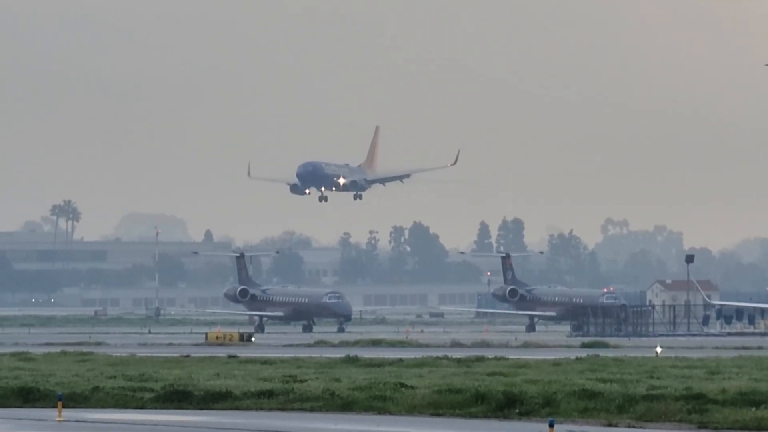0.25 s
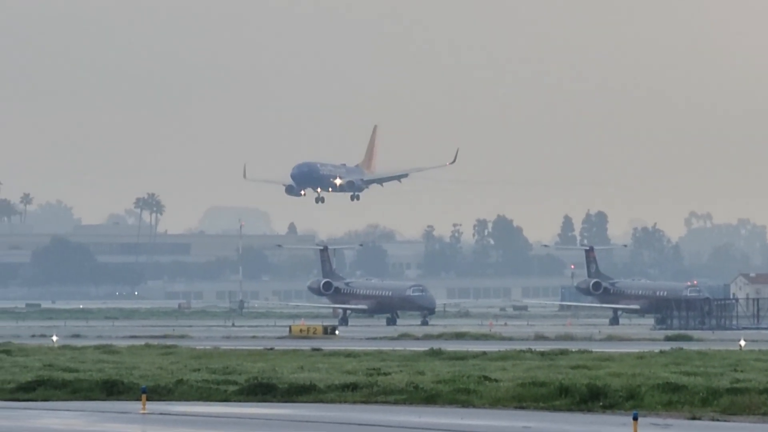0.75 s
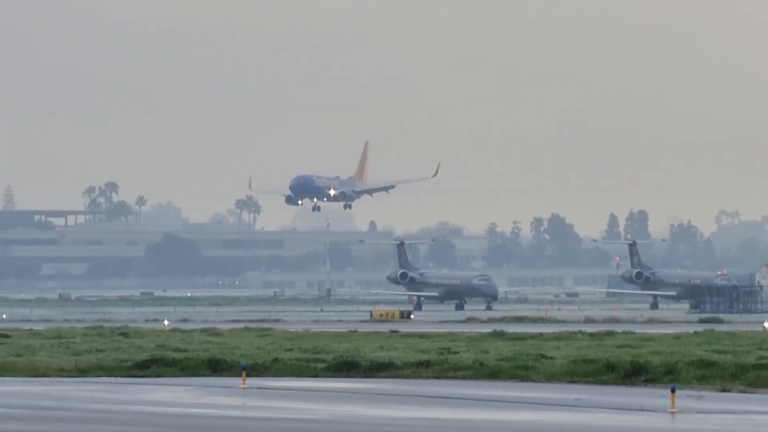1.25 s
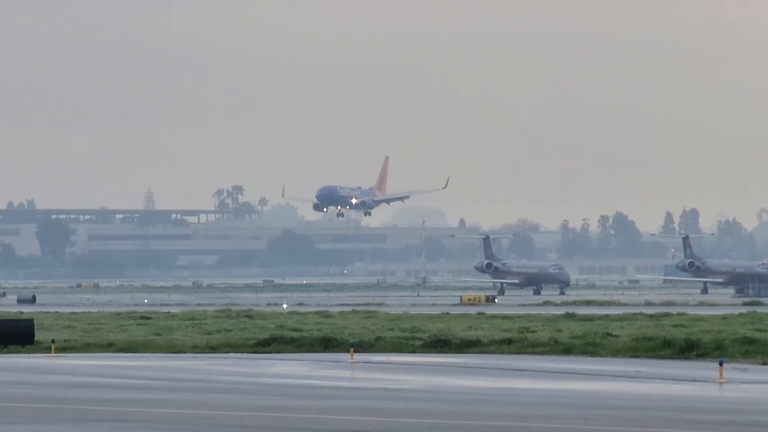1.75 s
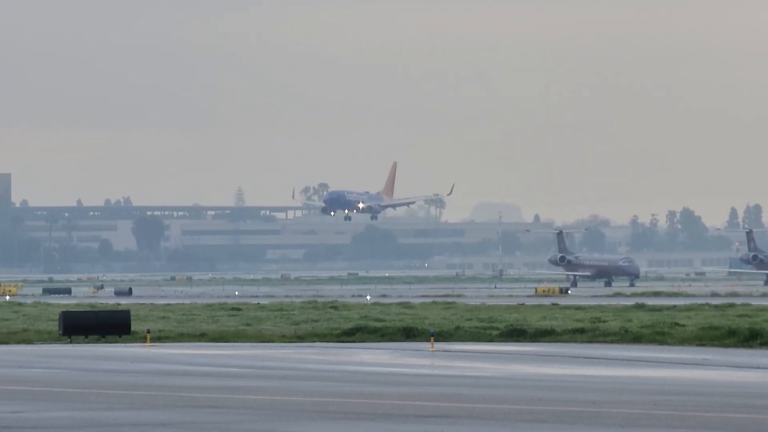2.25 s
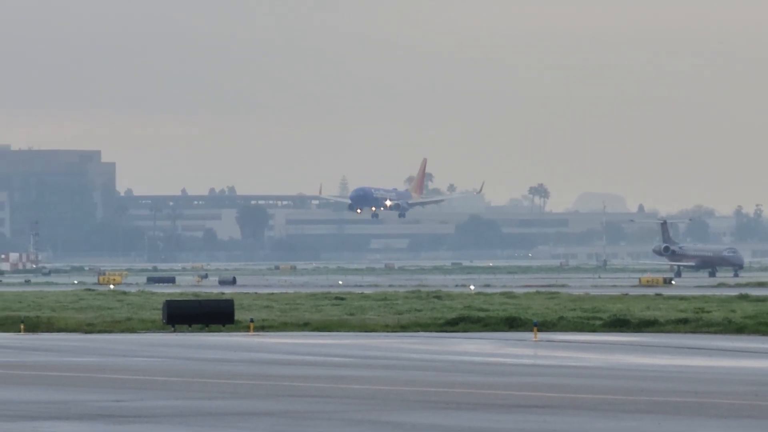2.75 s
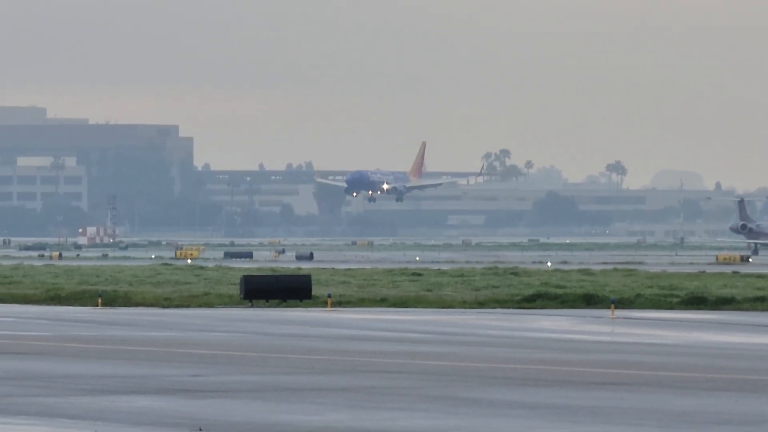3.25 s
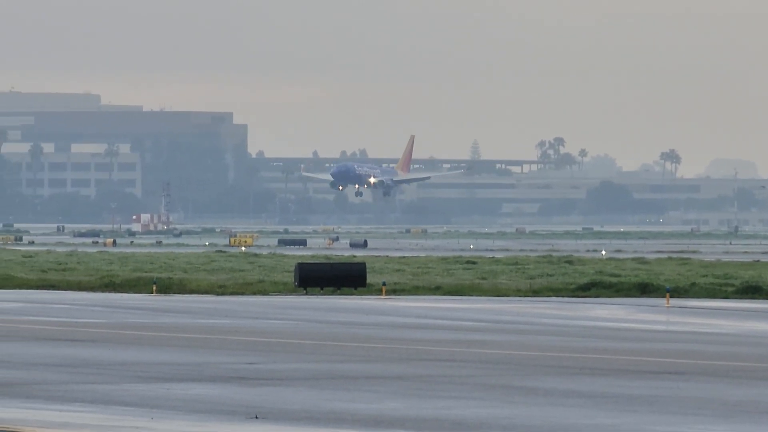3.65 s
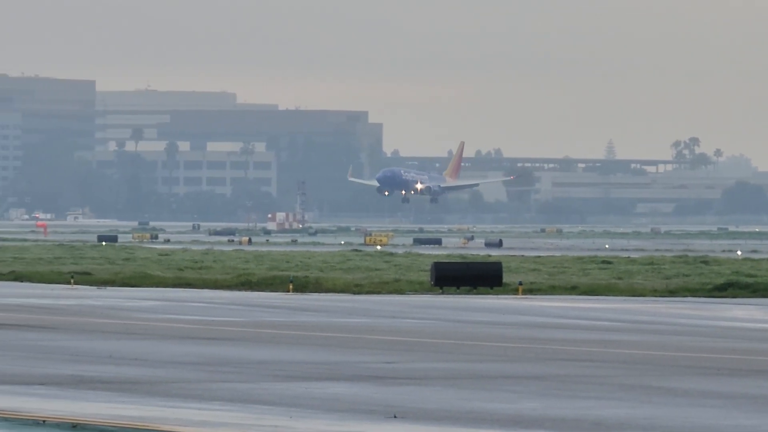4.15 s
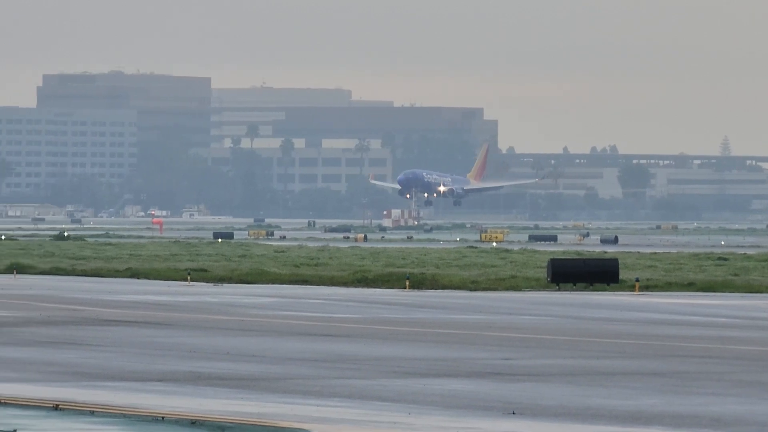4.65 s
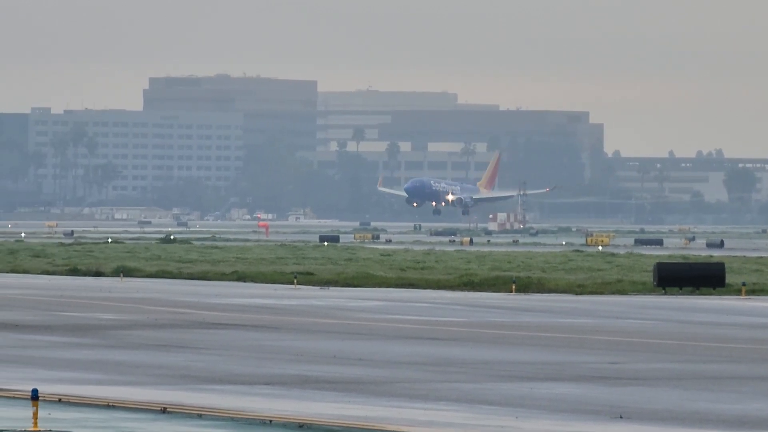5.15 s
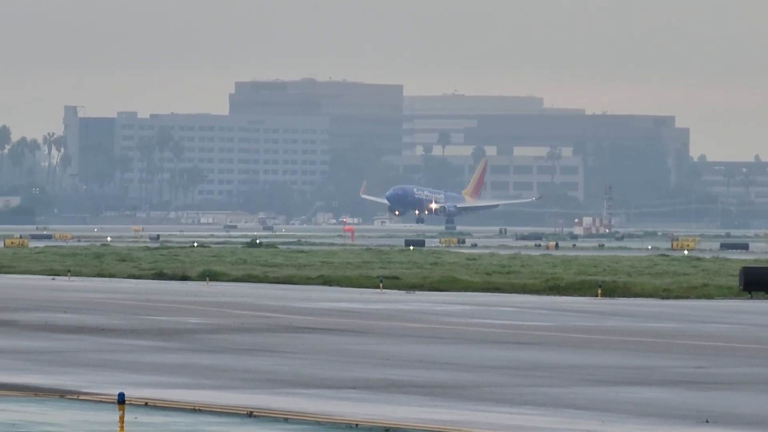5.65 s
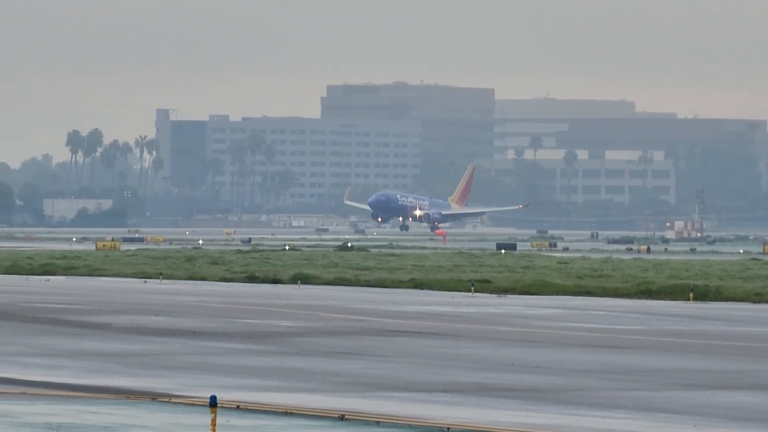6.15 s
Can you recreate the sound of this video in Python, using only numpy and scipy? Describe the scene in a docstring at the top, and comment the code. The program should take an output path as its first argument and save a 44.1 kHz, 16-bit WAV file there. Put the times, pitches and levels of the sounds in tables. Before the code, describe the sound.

A jet airliner lands far across an open airfield. Its deep, churning exhaust rumble is the main sound, running for about six and a half seconds with gentle swells, over a steady wash of other distant engines. An airy fan howl is strongest in the first second, with two short downward swishes. It swells again between 2 and 2.7 seconds, returns more weakly from about 4.3 to 5.5, then fades. Thin, wavering fan tones come and go, clearest around half a second and again near 3 seconds. Close to the microphone, a plastic camera body gives a quick cluster of ticks at about 2.9 seconds, the first one sharpest. A jacket rustles faintly with tiny snaps here and there, mostly between 2.5 and 4.3 seconds. A very faint microphone hiss lies underneath, and the rumble continues to the end.

```python
"""A jet airliner lands far across an airfield. Its churning exhaust rumbles, and its engine fans make
a howl, which the moving air carries over in swells, and a few thin tones. Other far engines blend
into a steady wash. Close by, a jacket rustles and snaps as its fibres slip, and a plastic camera body
ticks under the hand. A faint microphone hiss lies beneath it all."""
import sys
import numpy as np
from scipy import signal
from scipy.fft import rfft, irfft
from scipy.io import wavfile
from scipy.ndimage import uniform_filter1d

SR = 44100
rng = np.random.default_rng(int(sys.argv[2]) if len(sys.argv) > 2 else 0)


def transcribe(signal):
    """Save signal, clipped to [-1, 1], as a 16-bit WAV file at the path in sys.argv[1]."""
    frames = np.atleast_2d(signal).T
    limited = np.clip(frames, -1, 1)
    pcm = np.round(limited * 32767).astype(np.int16)
    wavfile.write(sys.argv[1], SR, pcm)


N = 282681

# how the rumble swells: (time [s], deep part [dB], upper part [dB], hoarse part [dB])
RUMBLE_SWELLS = [(0.0, -24, -25.5, -24.5), (0.27, -28.5, -18.5, -25), (0.55, -29.5, -27, -25),
                 (.85, -26.5, -23, -25.5), (1.15, -28, -22.5, -27.5), (1.58, -23.5, -28, -28.5),
                 (1.85, -27, -20.5, -28.5), (2.3, -21, -25, -27.5), (2.75, -25, -27.5, -27.5),
                 (3.1, -29, -25.5, -27), (3.5, -28, -26, -29), (4.2, -26.5, -27.5, -27),
                 (4.85, -24.5, -24, -29), (5.3, -26, -23.5, -28), (5.8, -27.5, -21.5, -28.5),
                 (6.41, -28.5, -21.5, -28)]
# how strong its low and high sounds are: (frequency [Hz], level [dB])
RUMBLE_COLOUR = [(12, -41), (25, -27), (35, -9), (50, 3.5), (85, 1), (110, 0), (140, -3.5), (180, -10),
                 (250, -17), (350, -21.5), (500, -30.5), (700, -75), (1500, -120)]
# how its two sides compare: (frequency [Hz], likeness [0-1], left lead [rad], left minus right [dB])
RUMBLE_STEREO = [(20, 0.93, 0, 2.5), (60, 0.99, -.05, 0), (131, .98, -.1, -0.1), (213, 0.99, -0.067, 0),
                 (430, 0.7, 0.012, 0.5)]


def exhaust_rumble():
    """Churning exhaust makes a low noise whose deep, upper and hoarse parts each swell on their own."""
    def swell_db(hz, t):
        deep_db, upper_db, hoarse_db = follow(RUMBLE_SWELLS, t)
        upper, hoarse = above(hz, 100, steepness=3.7), above(hz, 171.7, steepness=7.6)
        return (1 - upper) * deep_db + (upper - hoarse) * upper_db + hoarse * hoarse_db
    return noise(RUMBLE_COLOUR, RUMBLE_STEREO, 4096, swell_db, patch_db=1, patch_hz=25, patch_s=.21)


# how the howl swells: (time [s], level [dB], extra level above about 1900 Hz [dB])
HOWL_SWELLS = [(0.0, -38, -10), (0.07, -37, -5.5), (0.2, -34, -2.5), (0.36, -35.5, -5), (0.55, -38, 0),
               (0.68, -39, -2.5), (0.95, -44, -4), (1.08, -39.5, -8), (1.14, -46.5, -2.5), (1.6, -47, -7.5),
               (1.8, -44, -1), (1.93, -47, -4.5), (2.15, -41, -5), (2.27, -39.5, -1.5), (2.4, -44, -2),
               (2.56, -39.5, -4), (2.65, -45, -0.5), (3.1, -51.5, 0), (3.6, -56, 3.5), (4.3, -49.5, 0),
               (4.95, -49, -0.5), (5.06, -46, 6), (5.16, -54, 6), (5.32, -49, 4), (5.5, -51, 2),
               (6.41, -62, 8)]
# how strong its low and high sounds are: (frequency [Hz], level [dB])
HOWL_COLOUR = [(530, -42), (900, -13), (1130, -12), (1310, -5), (1530, -4.5), (2010, -0.5), (2190, -2),
               (2450, -10.5), (2920, -11.5), (3390, -21), (3850, -34.5), (4500, -56.5), (5850, -85),
               (9900, -120)]
# how its two sides compare: (frequency [Hz], likeness [0-1], left lead [rad], left minus right [dB])
HOWL_STEREO = [(1010, 0.81, -0.47, -3), (1300, .92, 0.97, 3), (1720, 0.85, -1.4, -0.5), (2200, 1, -0.65, 0),
               (2400, 0.94, -.7, 3.5), (3000, 0.095, -0.4, -0.5), (3400, 1, 0.58, -6),
               (4170, 0.18, -0.96, 7)]
# a louder band slides down through it: (start [s], length [s], from [Hz], to [Hz], boost [dB])
SWISHES = [(0.059, 0.43, 2380, 1236, 4.5), (0.42, 0.21, 2080, 1192, 7)]


def fan_howl(flutter_db=1.5, swish_width_hz=170):
    """Fan blades make a streaky noise; moving air swells it and changes how bright it is."""
    def swell_db(hz, t):
        level_db, treble_db = follow(HOWL_SWELLS, t)
        total_db = level_db + flutter_db * wander(t, .03) + above(hz, 1900, steepness=16) * treble_db
        for start, length, from_hz, to_hz, boost_db in SWISHES:
            progress = np.clip((t - start) / length, 0, 1)
            centre_hz = from_hz * (to_hz / from_hz) ** progress
            band = np.exp(-((hz - centre_hz) / swish_width_hz) ** 2)
            total_db = total_db + boost_db * np.sqrt(np.sin(np.pi * progress) + 1e-9) * band
        return total_db
    return noise(HOWL_COLOUR, HOWL_STEREO, 1024, swell_db, patch_db=3, patch_hz=45, patch_s=.053)


# thin tones of the fans: (pitch [Hz], waver [Hz], left lead [rad], list of (time [s], level [dB]))
FAN_TONES = [(685.3, 1.3, .2, [(0, -63), (.85, -59), (1.4, -59), (2.35, -60), (4.0, -57.5), (4.7, -59.5),
             (5.4, -68), (6.41, -68)]), (1386, 4., 1.0, [(1.9, -70), (2.25, -51), (2.55, -52), (2.9, -46),
             (3.05, -58), (3.5, -74), (3.9, -57), (4.2, -54), (4.55, -54), (4.9, -55), (5.1, -65),
             (5.35, -52), (5.6, -64), (5.78, -51), (5.98, -68), (6.2, -51), (6.41, -60)]),
             (1350, 4., .4, [(0, -62), (.25, -62), (.41, -48), (.46, -52), (.53, -39), (.68, -64),
             (1.25, -63), (1.37, -54), (1.6, -72), (2.1, -58)]), (1450, 4., .4, [(0, -53), (.07, -45),
             (.14, -57), (.24, -41), (.45, -59), (.55, -48), (.7, -63), (.95, -54), (1.17, -72),
             (1.43, -48), (1.55, -60), (2.13, -54), (2.5, -59), (3.0, -67), (4.8, -65), (5.01, -52),
             (5.2, -75)]), (2538, 7., .8, [(3, -71), (5, -69), (6.41, -71)]), (5308, 12., 2.1, [(4.2, -93),
             (5.2, -88), (6.41, -88)])]


def fan_tone(hz, waver_hz, lead, levels, flicker_db=3.5):
    """Spinning blades make a slightly wavering tone that comes and goes on its long way through the air."""
    t = np.arange(N) / SR
    flicker = unit_level(gain_of(flicker_db * wander(t, .035)))
    level = gain_of(follow(levels, t)[0]) * flicker
    phase = 2 * np.pi * np.cumsum(hz + waver_hz * wander(t, .0678)) / SR
    start, end = levels[0][0], levels[-1][0]
    already_on = (start == 0) * (t < .1)  # no fade-in for a tone that is there from the start
    fade = np.clip(np.minimum(t - start, end - t) / .1 + already_on, 0, 1)
    return np.sqrt(2) * level * fade * np.sin([phase + lead, phase])


# how strong the wash's low and high sounds are: (frequency [Hz], level [dB])
WASH_COLOUR = [(260, -9.5), (500, -7), (800, -8), (1200, -10.5), (1400, -2.5), (1620, -12), (2050, -11.5),
               (2950, -17), (3300, -26), (3900, -30.5), (4250, -39), (4700, -39.5), (5300, -40.5),
               (6000, -52.5), (9000, -90.5)]
# how its two sides compare: (frequency [Hz], likeness [0-1], left lead [rad], left minus right [dB])
WASH_STEREO = [(313, 1, 0.5, -1), (504, 0.76, -0.5, 0.5), (750, 0.9, 1.17, -0.5), (1274, 0.16, -2, -0.5),
               (1400, 1, -4.5, -2), (1750, 0.085, -2, -1), (1960, 1, 0.5, 1), (2540, 0.62, -1.36, 0),
               (3350, 0.83, 3.5, 2), (3460, 0.17, 3, 7.5), (4080, 0.8, -7.5, -3.5), (4540, 0.63, -8, -6),
               (5970, 0.02, 2.5, -3)]


def engine_wash():
    """Many far engines blend into a steady rush that drifts in patches."""
    return gain_of(-44) * noise(WASH_COLOUR, WASH_STEREO, 1024, patch_db=1.2, patch_hz=250, patch_s=.07)


# ticks of the camera body: (time [s], peak [dB], left minus right [dB])
TICKS = [(2.8677, -20, 4.5), (2.883, -32, -0.5), (2.8904, -39, 0.5), (2.8976, -35, -2), (2.913, -28, -1),
         (2.9236, -31, 5), (2.9314, -36, 5)]
# notes its shell rings at: (pitch [Hz], level [dB], time to fade by 60 dB [s])
SHELL_NOTES = [(2080, 4, 0.01), (2690, 5.5, 0.0082), (3340, -2, 0.0065), (4260, -15, 0.0086),
               (5530, -20, 0.015), (6400, -24, 0.013), (7400, -30, 0.007)]


def camera_ticks(rise_s=.00033):
    """The plastic shell rings briefly under the hand, a little differently each time and on each side."""
    out, t = np.zeros((2, N)), np.arange(1500) / SR
    hz, note_db, ring_s = np.transpose(SHELL_NOTES)[:, :, None]
    for time, peak_db, pan_db in TICKS:
        phase, uneven = rng.random((2, 2, len(SHELL_NOTES), 1))
        levels = gain_of(note_db + 4 * (uneven - .5) - 60 * t / ring_s)
        notes = levels * np.sin(2 * np.pi * (hz * t + .4 * phase[0] + .1 * phase))
        tick = notes.sum(1) * (1 - np.exp(-t / rise_s))
        tick /= abs(tick).max(1, keepdims=True)
        add(out, time, gain_of(peak_db) * sides(pan_db)[:, None] * tick)
    return out


# rubs of cloth: (middle [s], length [s], level [dB], dull minus bright [dB], left minus right [dB])
STROKES = [(0.184, .08, -76.5, -11, -5), (0.268, .08, -74.5, -11, 0), (1.136, 0.057, -85, -14, -8.5),
           (1.74, 0.066, -76.5, 6, -1.5), (1.81, .04, -79.5, 5, 1), (1.97, 0.042, -78.5, -13.5, -11),
           (2.056, 0.092, -76.5, -10.5, -9), (2.19, 0.032, -77, -3.5, -8), (2.396, .04, -80, -10, -3),
           (2.492, .08, -74, -5, -7), (2.59, 0.11, -71, -4, 3), (2.764, 0.087, -63.5, -5, -7),
           (2.837, 0.021, -62, -6, -2), (2.89, .05, -66.5, 17, 1), (2.94, .07, -60, 0, 0),
           (3.02, 0.06, -70, 12, 0), (3.065, 0.11, -55, -10, -4), (3.193, 0.12, -71, -10, 1),
           (3.31, 0.067, -66, -0.5, 0), (3.42, 0.13, -72.5, -4, -4), (3.612, 0.1, -72, -1, -1),
           (3.927, 0.12, -67.5, -5, 1), (4.024, .05, -83, -10, 2), (4.214, 0.078, -73.5, -5.5, 1),
           (4.316, 0.098, -72, -5, -1), (4.86, 0.066, -76.5, -5, -3), (4.93, .06, -71.5, -5, 0),
           (5.229, .07, -81, 2, 4), (5.397, .04, -74.5, -4, 0), (5.636, .06, -78, -9.5, 5),
           (6.254, 0.041, -86, -9, 3)]


def jacket_rustle(slips_per_s=1100, spread_db=2, slip_s=.0006, resting_db=-88.5, clump_db=1.5):
    """Fibres slip in tiny, uneven bursts over a soft rub, louder with each stroke of the cloth."""
    block = 64  # samples that share one level
    t = np.arange(0, N, block) / SR
    bright_gain = np.full((2, len(t)), gain_of(resting_db))
    dull_gain = bright_gain * gain_of(4)
    for middle, length, level_db, dull_db, pan_db in STROKES:
        fall_db = 7.5 * abs(2 * (t - middle) / length) ** 1.4
        stroke = gain_of(level_db - fall_db) * sides(pan_db)[:, None]
        bright_gain += stroke
        dull_gain += gain_of(dull_db) * stroke
    slip_sizes = gain_of(spread_db * np.minimum(rng.exponential(1, N), 4))
    slips = slip_sizes * (rng.random(N) < slips_per_s / SR)
    bursts = unit_level(signal.lfilter([1], [1, -np.exp(-1 / (SR * slip_s))], slips))
    rubbing = unit_level((1 + bursts) * rng.standard_normal((2, N)))
    bright, dull = cloth_voices(rubbing)
    clumps = gain_of(clump_db * wander(t, .0075))
    bright_gain, dull_gain = np.repeat(clumps * [bright_gain, dull_gain], block, axis=2)[..., :N]
    return bright_gain * bright + dull_gain * dull


# snaps of cloth: (time [s], level [dB], left minus right [dB], dull minus bright [dB])
SNAPS = [(0.1266, -58, 6, -4), (0.1555, -56, -6.5, -16), (0.2119, -55, -4, -18), (1.1243, -63.5, 1, -10),
         (1.7402, -62, -3, 6), (1.9644, -61, -9, -20), (2.0283, -60, -13, -14), (2.0747, -59, -9, -18),
         (2.1869, -62.5, -8, -8), (2.4956, -55, -5, -2), (2.7541, -55, -15, -18), (2.829, -48, 3, -9),
         (2.8674, -54.5, 2, -3), (2.9113, -57, 2, -2), (2.9706, -50, 0, -16), (3.2345, -55.5, -4, -16),
         (3.2708, -55, -2.5, -13), (3.2859, -49, -6, -15), (3.5285, -60, 1.5, 4), (3.62, -50.5, -7, -13),
         (3.8853, -53.5, 0, -10), (3.9469, -53, -1, -5), (3.9684, -57, 3, -17), (4.015, -60, -7, -15),
         (4.1934, -57, 2, -14), (4.2398, -60, 2, 6), (4.294, -53, 1.5, -16), (4.4722, -69, 3, 12),
         (4.9317, -59, 3, -6), (5.3805, -57, 10, -13)]


def jacket_snaps(decay_s=.00096):
    """Each snap of the cloth is a very short burst of noise."""
    out, t = np.zeros((2, N)), np.arange(512) / SR
    for time, level_db, pan_db, dull_db in SNAPS:
        burst = rng.standard_normal((2, 512)) * np.exp(-abs(t - .002) / decay_s)
        bright, dull = cloth_voices(burst)
        snap = bright + gain_of(dull_db) * dull
        add(out, time - .001, gain_of(level_db) * sides(pan_db)[:, None] * snap)
    return out


# the bright and the dull voice of the cloth, each: (frequency [Hz], level [dB])
CLOTH_BRIGHT = [(6000, -40), (8500, -16), (10000, -11), (11000, -4), (12800, 0), (14000, -2.5), (15700, -5),
                (16500, -40)]
CLOTH_DULL = [(2500, -23.5), (3500, 0), (4500, -3.5), (5500, -3), (6400, -8.5), (7500, -4.5), (8200, -14.5),
              (9500, -19), (12000, -29)]


def cloth_voices(sound):
    """Turns plain noise into the jacket's bright sound and its dull sound, equally strong."""
    length = sound.shape[-1]
    hz = np.fft.rfftfreq(length, 1 / SR)
    filters = [unit_level(gain_of(look_up(colour, hz)[0])) for colour in (CLOTH_BRIGHT, CLOTH_DULL)]
    return [irfft(rfft(sound) * gains, length) for gains in filters]


# how strong the hiss's low and high sounds are: (frequency [Hz], level [dB])
HISS_COLOUR = [(4500, -32), (6000, -3.5), (7500, 1.5), (9000, -11.5), (10300, -8), (12000, 2), (15700, -3),
               (16500, -42.5)]


def microphone_hiss():
    """Each of the two microphones adds a faint hiss of its own."""
    return gain_of(-86) * noise(HISS_COLOUR, stereo=[(1, .003, 0, 0)], size=512)


def noise(colour, stereo, size, swell_db=lambda hz, t: 0, patch_db=0, patch_hz=400, patch_s=.08):
    """Stereo noise built from slices of `size` samples, with swells and random louder and softer patches."""
    hop = size // 4
    slices, hz = N // hop + 5, np.fft.rfftfreq(size, 1 / SR)[:, None]
    a, b, c, d, patches = rng.standard_normal((slices, len(hz), 5)).T
    for _ in range(2):  # blur the patches over frequency and time
        patches = uniform_filter1d(patches, max(round(patch_hz * size / SR), 1), 0)
        patches = uniform_filter1d(patches, max(round(patch_s * SR / hop), 1), 1)
    likeness, lead, pan_db = look_up(stereo, hz)
    left, unrelated = a + 1j * b, c + 1j * d
    right = likeness * left * np.exp(-1j * lead) + np.sqrt(np.maximum(1 - likeness ** 2, 0)) * unrelated
    spectra = np.array([left, right]) * gain_of(look_up(colour, hz)[0]) * sides(pan_db)
    steady = signal.istft(spectra, nperseg=size, noverlap=size - hop)[1]
    spectra *= gain_of(swell_db(hz, np.arange(slices) * hop / SR) + patch_db * unit_level(patches))
    return signal.istft(spectra, nperseg=size, noverlap=size - hop)[1][:, :N] / steady.std()


def wander(t, span_s):
    """A smooth random wobble of typical size 1 that changes over about span_s."""
    width = max(round(span_s / (t[1] - t[0])), 1)
    return unit_level(uniform_filter1d(uniform_filter1d(rng.standard_normal(len(t)), width), width))


def gain_of(db):
    """Turns decibels into a number to multiply by."""
    return 10 ** (np.asarray(db) / 20)


def unit_level(x):
    """Scales a signal to an average strength (rms) of 1."""
    return x / np.sqrt(np.mean(x ** 2) + 1e-20)


def look_up(rows, hz):
    """A table's values at these frequencies, blended between rows on a pitch scale."""
    row_hz, *columns = np.transpose(rows)
    return np.array([np.interp(np.log(hz + 1), np.log(row_hz + 1), column) for column in columns])


def follow(rows, t):
    """A table's values at these times, blended between rows."""
    times, *columns = np.transpose(rows)
    return [np.interp(t, times, column) for column in columns]


def above(hz, edge_hz, steepness):
    """Rises smoothly from 0 below the edge to 1 above it."""
    return 1 / (1 + (edge_hz / (hz + 1)) ** steepness)


def sides(pan_db):
    """Left and right gains, with the left louder by pan_db."""
    return gain_of(np.array([pan_db / 2, -pan_db / 2]))


def add(mix, start_s, sound):
    """Mixes a stereo sound in at a given time."""
    part = mix[:, round(start_s * SR):][:, :sound.shape[1]]
    part += sound[:, :part.shape[1]]


def scene():
    """The jet and the far engines, then the small sounds close by and the hiss."""
    tones = sum(fan_tone(*row) for row in FAN_TONES)
    engines = exhaust_rumble() + fan_howl() + tones + engine_wash()
    return engines + camera_ticks() + jacket_rustle() + jacket_snaps() + microphone_hiss()


def record(dry, fade_s=.002, cutoff_hz=15750):
    """Softens both ends and cuts the very highest treble."""
    faded = dry * signal.windows.tukey(N, 2 * fade_s * SR / N)
    low_pass = signal.firwin(511, cutoff_hz, window=("kaiser", 9), fs=SR)
    return signal.oaconvolve(faded, low_pass[None], "same")


dry = scene()
out = record(dry)
transcribe(out)
```